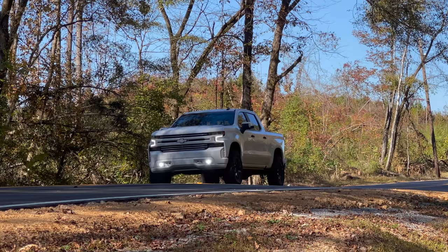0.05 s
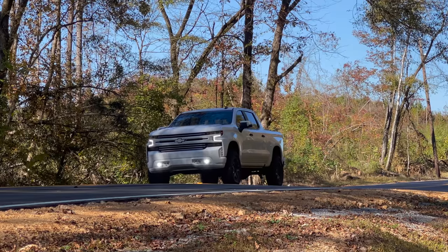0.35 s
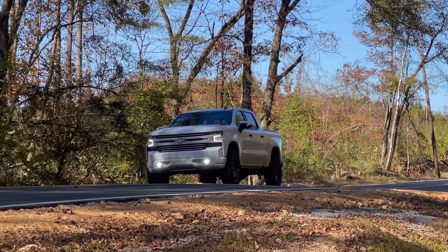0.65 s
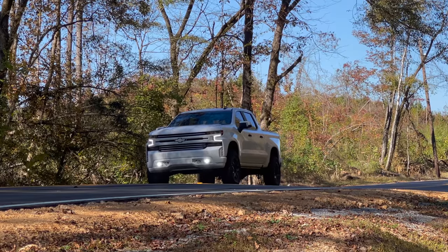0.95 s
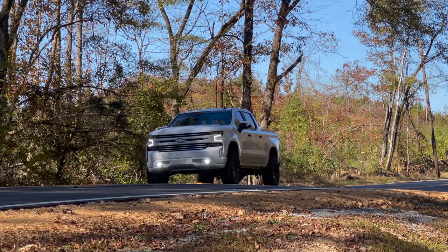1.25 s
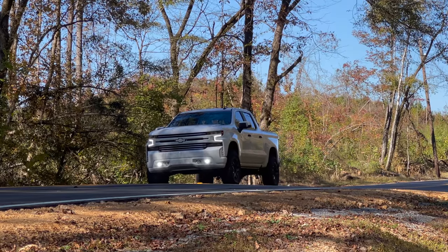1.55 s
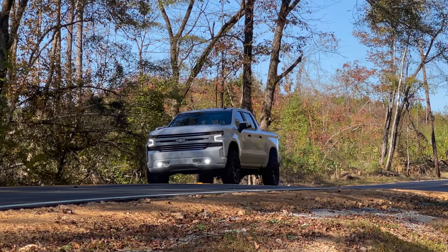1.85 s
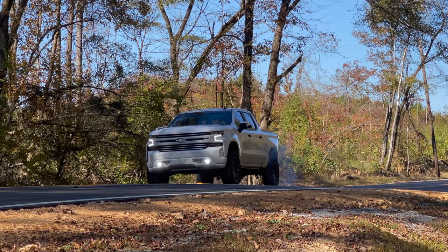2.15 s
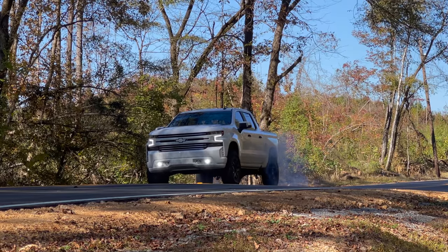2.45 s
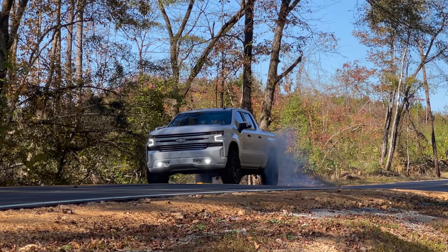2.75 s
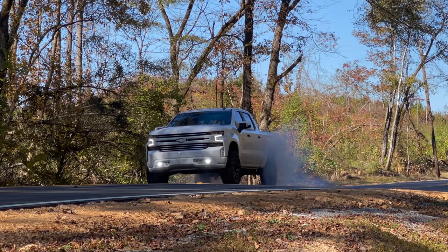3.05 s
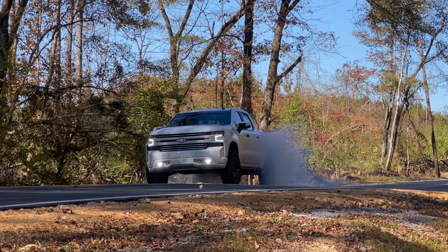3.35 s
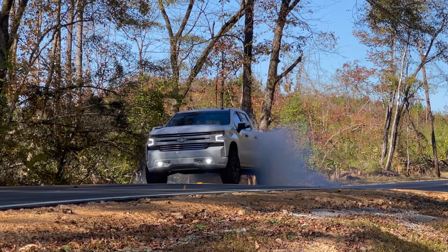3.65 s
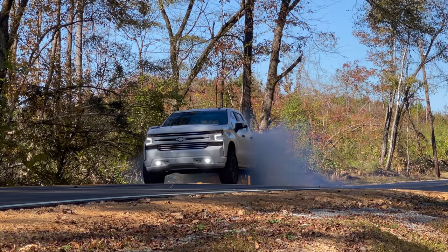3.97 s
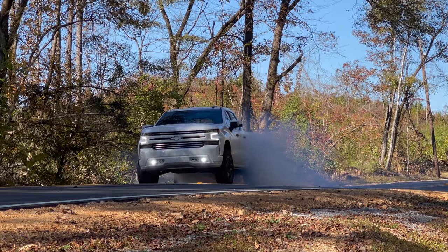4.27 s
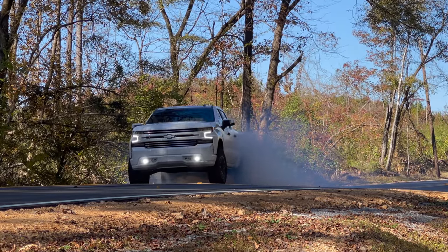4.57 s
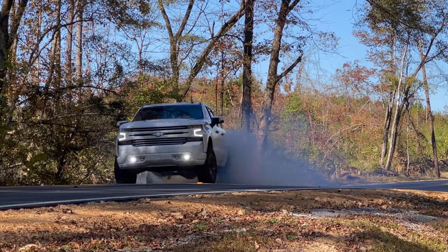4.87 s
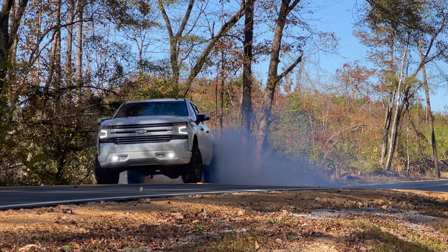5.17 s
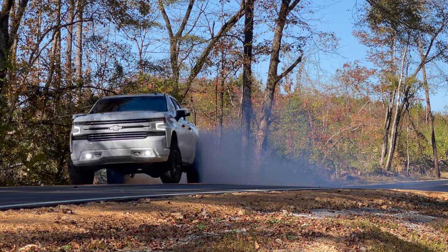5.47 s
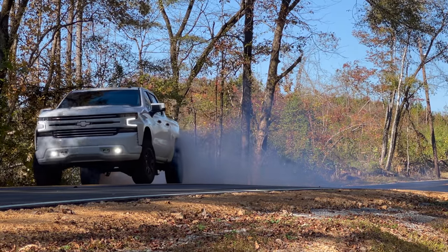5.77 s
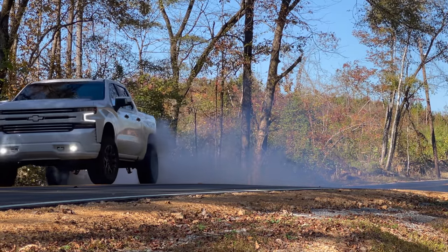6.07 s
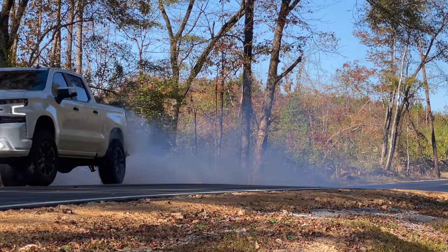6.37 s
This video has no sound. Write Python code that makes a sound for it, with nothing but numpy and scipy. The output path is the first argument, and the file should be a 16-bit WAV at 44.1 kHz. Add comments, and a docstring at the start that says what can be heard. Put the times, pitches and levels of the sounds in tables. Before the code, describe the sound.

Truck burnout outdoors: a booming V8 climbs to a high-revving roar while spinning tyres screech, then scrub and hiss, growing louder.

```python
"""A V8 pickup does a burnout on a country road among trees, with dull echoes from the trunks.
The engine opens with a low-rev boom and climbs: the exhaust drones on the orders of the engine cycle,
through pipes that warm up, and puffs rough gas at every firing. Almost at once the rear tyres break
loose and squeal in stick-slip; by two seconds they have melted into a smoky hiss.
From about four seconds the truck rolls closer, and exhaust and hiss swell to the end."""
import sys
import numpy as np
from scipy import signal
from scipy.fft import rfft, irfft, next_fast_len
from scipy.io import wavfile

SR = 44100
rng = np.random.default_rng(int(sys.argv[2]) if len(sys.argv) > 2 else 0)


def log_audio(samples):
    """Write samples as a 16-bit WAV file to the path given in sys.argv[1]."""
    # one column per channel
    frames = np.atleast_2d(samples).T
    # limit to full scale, then quantise
    limited = np.clip(frames, -1, 1)
    pcm = np.round(limited * 32767).astype(np.int16)
    wavfile.write(sys.argv[1], SR, pcm)


N = 287267
TIME = np.arange(N) / SR
LOW_END_APPROACH = 1.34   # dB the low end gains for each dB of approach


def from_db(db):
    """Decibels to gain."""
    return np.exp(np.asarray(db) * (np.log(10) / 20))


def rms_one(x):
    """Scale to unit power."""
    return x / np.sqrt(np.mean(x ** 2) + 1e-20)


def in_time(rows):
    """Each column of an automation curve, sample by sample."""
    times, *columns = np.transpose(rows)
    return [np.interp(TIME, times, column) for column in columns]


def at_hz(points, hz):
    """Read a spectrum on a log-frequency axis."""
    freqs, values = np.transpose(points)
    return np.interp(np.log(hz), np.log(freqs), values)


def bump(middle, length):
    """A flat-topped swell of height 1."""
    away = np.minimum((2 * (TIME - middle) / length) ** 2, 9)
    return np.exp(-away * away)


def drift(rate_hz):
    """Smooth random wandering of spread 1."""
    hop, settle = 40, 2000
    pole = np.exp(-2 * np.pi * rate_hz * hop / SR)
    white = rng.standard_normal(N // hop + settle + 2)
    slow = signal.lfilter([1], [1, -2 * pole, pole * pole], white)[settle:]
    return np.interp(np.arange(N) / hop, np.arange(len(slow)), rms_one(slow))


def turbulence(spectrum, patchy_db):
    """Half-octave bands of stereo noise, each flickering on its own by patchy_db; rms 1."""
    # stereo image of the noise: f/Hz, left-right correlation
    likeness = [(30, .98), (200, .995), (600, 0.72), (1300, 0.93), (2300, 1), (3600, 0.8), (6000, 1),
                (8500, 1), (12000, 0.76)]
    out, edges = 0, 20 * 2 ** np.arange(0, 9.6, .5)
    white = rng.standard_normal((2, 2, N))
    for k, (low, high) in enumerate(zip(edges, edges[1:])):
        if high < spectrum[0][0] or low > spectrum[-1][0]:
            continue
        band = signal.butter(2, [low, high], "band", fs=SR, output="sos")
        mid, side = signal.sosfilt(band, white[k % 2])
        hz = np.sqrt(low * high)
        alike = at_hz(likeness, hz)
        gain = from_db(at_hz(spectrum, hz) + patchy_db * drift(35))
        out = out + gain * (np.sqrt(1 + alike) * mid + np.sqrt(1 - alike) * side * [[1], [-1]])
    return rms_one(out)


def approach_db(distance_m, roll_s, accel_m_per_s2):
    """Gain as the truck, standing at first, creeps closer ever faster."""
    travelled_m = .5 * accel_m_per_s2 * np.maximum(TIME - roll_s, 0) ** 2
    return 20 * np.log10(distance_m / np.maximum(distance_m - travelled_m, 1))


def tree_echoes(x, t60_s, dull_hz):
    """Trunks scatter many faint dull echoes, different ones to each side."""
    echoes = np.zeros((2, N))
    for k, delay_s in enumerate(rng.uniform(.03, .35, 48)):
        lag = int(delay_s * SR)
        echoes[k % 2, lag:] += rng.choice([-1, 1]) * from_db(-60 * delay_s / t60_s) * x[:N - lag]
    return signal.sosfilt(signal.butter(1, [250, dull_hz], "band", fs=SR, output="sos"), echoes) / 2


def tyre_smoke(effort_db, near_db, grit_db):
    """Hot tread scrubs over the asphalt and sprays fine grit, hissing more as it melts."""
    # colours of the scrub and of the hiss: f/Hz, relative level/dB
    scrub_colour = [(500, -14), (1000, 6), (1700, 3), (2500, 5.5), (3400, -4.5), (4600, -9.5),
                    (7000, -33.5), (12000, -43)]
    hiss_colour = [(1800, -31), (3500, 1.5), (4700, 2), (6500, -2.5), (8700, -4.5), (12000, -7.5),
                   (14000, -16.5)]
    # fader ride on the hiss of melting rubber: t/s, level/dB
    hiss_ride = [(0.05, -53), (0.2, -56), (0.8, -53), (1.4, -50), (2.35, -52), (2.6, -48.5), (3.2, -43.5),
                 (3.45, -50), (4.1, -51), (4.6, -46.5), (5.7, -40.5), (6.5, -38)]
    hiss_db, = in_time(hiss_ride)
    break_loose_s, rise_s = .17, .13
    spinning = np.clip((TIME - break_loose_s) / rise_s, 0, 1)
    scrub_db = -37 + 0.68 * effort_db + near_db
    scrub = spinning * from_db(scrub_db) * turbulence(scrub_colour, patchy_db=1.0)
    hiss = from_db(hiss_db + 0.5) * turbulence(hiss_colour, patchy_db=0.0)
    return (scrub + hiss) * from_db(grit_db * drift(220))


def rubber_mode(curve, waver, flutter_db):
    """One self-excited vibration of a slipping tyre: its phase and its tone."""
    hz, level_db = in_time(curve)
    first, last = curve[0][0], curve[-1][0]
    gate = np.interp(TIME, [first - .02, first + .02, last - .05, last + .05], [0, 1, 1, 0])
    phase = 2 * np.pi * np.cumsum(hz * (1 + waver * drift(75.5))) / SR
    return phase, np.sqrt(2) * gate * from_db(level_db + flutter_db * drift(46)) * np.sin(phase)


def tyre_squeal(ragged_rad):
    """Both tyres sing and beat together; the slipping rubber mixes their modes into ragged overtones."""
    # squeal of each rear tyre, and a lower tread mode: t/s, f/Hz, level/dB
    curve_a = [(0.22, 700.0, -43), (0.3, 701.0, -18), (0.42, 697.0, -23.5), (0.499, 694.0, -15.5),
               (0.801, 677.0, -16.5), (0.98, 658.0, -17), (1.12, 674.0, -17), (1.5, 681.0, -20.5),
               (1.701, 692.0, -26.5), (1.85, 710.0, -29.5), (1.95, 700.0, -35)]
    curve_b = [(0.28, 658.3, -35), (0.4, 656.7, -16.5), (0.68, 620.7, -19), (0.95, 611.6, -16.5),
               (1.32, 619.0, -22), (1.55, 639.0, -18), (1.76, 659.6, -17.5), (1.86, 693, -26.5),
               (1.95, 680, -38)]
    curve_tread = [(0.38, 637.6, -33), (0.62, 582, -34), (0.9, 549, -32), (1.65, 532.7, -35),
                   (1.85, 555.0, -45)]
    # overtones and sum tones: multiple of tyre A, of tyre B, of the tread mode, relative level/dB
    partials = [(2, 0, 0, -9), (0, 2, 0, 0), (0, 1, 1, -3), (0, 0, 2, -10), (0, 0, 3, -7), (0, 1, 2, -11),
                (0, 2, 1, -11), (0, 3, 0, -11), (0, 1, 3, -17), (0, 2, 2, -19), (0, 3, 2, -23)]
    # how hard the rubber sticks and slips, riding the overtones: t/s, level/dB
    slip = [(0.22, -62), (0.35, -39), (0.5, -33.5), (0.75, -30), (1.0, -31), (1.3, -29.5), (1.55, -34),
            (1.8, -41), (2.0, -65)]
    # tyre B's main squeal tone fades out briefly: t/s, gain/dB
    dips = [(0.805, -11), (1.04, -12), (1.26, -10), (1.38, -7), (1.56, -7.5)]
    phase_a, tyre_a = rubber_mode(curve_a, waver=0.0062, flutter_db=1.34)
    phase_b, tyre_b = rubber_mode(curve_b, waver=0.00816, flutter_db=1.5)
    phase_tread, tread = rubber_mode(curve_tread, waver=.013, flutter_db=2.5)
    phases = np.array([phase_a, phase_b, phase_tread])
    overtones = 0
    for *multiples, db in partials:
        jitter = ragged_rad * (sum(multiples) - 1) * drift(48)   # higher overtones are more ragged
        overtones += from_db(db) * np.sin(np.array(multiples) @ phases + jitter)
    slip_db, = in_time(slip)
    slip_gain = np.sqrt(2) * from_db(slip_db) * (TIME < slip[-1][0])
    dip_db = sum(db * bump(middle_s, length=0.082) for middle_s, db in dips)
    return tyre_a + from_db(dip_db) * tyre_b + tread + slip_gain * overtones


def lugging_db(cycle_hz):
    """Boom of the engine pulling at low revs; it dies as they rise."""
    boom_db, full_hz, gone_hz = 20.5, 17, 29.8
    return boom_db * np.clip((gone_hz - cycle_hz) / (gone_hz - full_hz), 0, 1)


def exhaust_gas(cycle_hz, angle, effort_db, near_db, puff_depth):
    """Turbulent gas leaves the tailpipes in puffs, one a firing, loping with the uneven banks."""
    # colours of the low rumble and of the midrange rasp: f/Hz, relative level/dB
    rumble_colour = [(25, -39), (45, -13), (75, -1.5), (135, -9.5), (220, -9.5), (300, 6), (420, -0.5),
                     (520, -9), (750, -11.5), (1200, -54)]
    rasp_colour = [(250, -33), (450, -3.5), (600, -0.5), (760, 1), (950, 2.5), (1300, -1.5), (1800, -9.5),
                   (2600, -18), (4000, -40), (9000, -52)]
    beat = .6 * np.cos(8 * angle) + .5 * np.cos(3 * angle) + .4 * np.cos(angle)
    puffs = rms_one(np.exp(puff_depth * beat))
    rumble_db = -33.5 + 0.36 * effort_db + 0.38 * lugging_db(cycle_hz) + LOW_END_APPROACH * near_db
    rasp_db = -31 + 0.9 * effort_db + near_db
    rumble = from_db(rumble_db) * turbulence(rumble_colour, patchy_db=2.5)
    rasp = from_db(rasp_db) * turbulence(rasp_colour, patchy_db=1.23)
    return puffs * (rumble + rasp)


def pipe_lag(order):
    """Phase lag in the pipes: a smeared thump, then a late, inverted ring whose top orders scatter."""
    thump_top, ring_top = 5, 10   # orders
    smear_turns, late_turns, scatter_turns = 0.057, 0.2608, .43
    if order <= thump_top:
        return 2 * np.pi * smear_turns * (thump_top - 1 - order) ** 2
    turns = late_turns * (order - thump_top) + scatter_turns * max(order - ring_top, 0) ** 2
    return np.pi + 2 * np.pi * turns


def exhaust_drone(cycle_hz, angle, effort_db, near_db):
    """Each order of the engine cycle swells and fades as it slides through the pipe resonances."""
    # uneven firing of the two banks: order (multiple of the cycle rate), relative level/dB
    orders = [(2, 0.1), (3, 1.2), (4, -2), (5, 0.8), (6, -0.5), (7, -6), (8, 0.65), (9, 4), (10, -3.5),
              (11, 3.5), (12, -7.5), (13, 1.5), (14, -2), (15, -0.7), (16, 1.1), (17, -0.5), (18, 1),
              (19, 1), (20, -1.5), (21, 3), (22, 4.5), (23, -6), (24, 1), (25, -2.5), (26, 2.5)]
    # response of pipes and muffler: f/Hz, gain/dB
    pipe = [(35.0, -41.5), (55.0, -14.5), (78.0, 0), (125.0, 2.3), (150.0, 6.5), (180.0, 2), (220.0, -6.5),
            (298.0, 2), (330.0, -0.5), (356.0, 3), (385.0, 0.3), (450.0, -7), (510.0, -26), (610.0, -13),
            (730.0, -34.5), (870.0, -18.5), (1050.0, -21)]
    # single orders swell or fade for a while: middle t/s, length/s, order, gain/dB
    swells = [(0.35, 0.6, 7, 5.5), (0.4, 0.61, 11, -11), (0.5, 0.81, 9, -9), (0.522, 0.46, 13, 5.5),
              (0.598, 1, 4, -13.5), (0.92, 0.96, 5, 4.5), (1.244, 0.21, 9, 6.5), (1.864, 0.31, 5, -8),
              (1.9, 0.64, 22, -8), (2.125, 0.13, 5, 2.5), (2.46, 0.8, 10, -16), (3.1, 0.78, 5, -6.5),
              (3.11, 0.43, 9, 2.5), (3.163, 0.34, 8, 7.5), (3.4, 0.74, 11, -2.5), (3.946, 0.9, 10, 4.5),
              (4.4, 2.5, 5, 7), (4.625, 0.44, 11, 4), (5.006, 0.66, 10, -19), (5.342, 0.25, 9, 1),
              (5.603, 1.1, 8, -5.5), (5.997, 0.6, 22, 5), (6.35, 0.63, 11, 4.5)]
    # fader ride on the bass, orders two to four: t/s, gain/dB
    bass_ride = [(0.3, 5), (1.0, -0.5), (2.3, -2.5), (3.0, 0.5), (4.2, -0.5), (5.4, 2.5), (5.95, 0),
                 (6.4, -3.5)]
    body_db = -32 + 0.41 * effort_db + LOW_END_APPROACH * near_db
    bass_db = body_db + in_time(bass_ride)[0]
    growl_db = -24.5 + .55 * effort_db + 10.5 * np.log2(cycle_hz / 37.7) + near_db   # grows with revs
    # the firing beat booms at low revs and drives its own octave
    firing_db = body_db + lugging_db(cycle_hz)
    booming_db = {8: firing_db, 16: np.maximum(growl_db, firing_db - 10.5)}
    # the resonances rise as the gas heats up
    warming_per_s, in_tune_s = 0.015, 3.0
    tuning = 1 + warming_per_s * (TIME - in_tune_s)
    drone = 0
    for order, order_db in orders:
        register_db = bass_db if order < 5 else body_db if order < 14 else growl_db
        level_db = booming_db.get(order, register_db) + order_db
        swell_db = sum(db * bump(t, length) for t, length, which, db in swells if which == order)
        if 5 < order < 14:   # the middle orders also fade in and out slowly, each on its own
            swell_db += 1.23 * drift(3.15)
        pipe_db = at_hz(pipe, order * cycle_hz / tuning)
        # combustion varies from cycle to cycle, which blurs the high orders most
        blur = 0.12 + 0.39 * (order / len(orders)) ** 3
        phase = order * angle - pipe_lag(order) + blur * drift(19)
        drone += from_db(level_db + swell_db + pipe_db) * (1 + blur * drift(8.6)) * np.sin(phase)
    flutter = from_db(-0.16 * drift(45))
    return np.sqrt(2) * drone * flutter


def scene():
    """Exhaust, squeal and their echoes sit slightly left of centre, over the scrub and hiss."""
    # engine speed in four-stroke cycles, eight firings each: t/s, f/Hz
    speed = [(0.03, 12.4), (0.2, 18.3), (0.3, 20.5), (0.6, 23.2), (1, 28.1), (1.45, 36.8), (1.82, 41.7),
             (2, 38.9), (2.11, 33.6), (2.2, 35.7), (2.3, 35.3), (2.9, 39.2), (3.17, 40.0), (3.8, 35.8),
             (4.25, 34.9), (4.6, 36.4), (5.1, 37.7), (5.35, 39.8), (5.8, 41.2), (6.51, 42.3)]
    # power put into the spinning wheels: t/s, level/dB
    effort = [(0.05, -15.5), (0.22, -10.5), (0.31, -5.5), (0.5, -4), (0.75, 2), (1.4, -3), (2.35, -2),
              (2.8, 3), (3.2, 2.5), (3.6, -2), (4.1, -4), (5, -0.9), (5.7, 2.5), (6.5, 2.5)]
    cycle_hz, = in_time(speed)
    effort_db, = in_time(effort)
    near_db = approach_db(distance_m=22.4, roll_s=3.736, accel_m_per_s2=2.93)
    angle = 2 * np.pi * np.cumsum(cycle_hz) / SR
    tones = exhaust_drone(cycle_hz, angle, effort_db, near_db) + tyre_squeal(ragged_rad=0.61)
    gas = exhaust_gas(cycle_hz, angle, effort_db, near_db, puff_depth=0.27)
    echoes = from_db(-16.5) * tree_echoes(tones, t60_s=2.0, dull_hz=2500)
    pan = from_db([[.7], [-.7]])
    return (tones + gas + echoes) * pan + tyre_smoke(effort_db, near_db, grit_db=0.4)


def record(dry):
    """The sound opens abruptly; two microphone ports part in phase near the top, which is then cut."""
    # phase lag of the left port in the high treble: f/Hz, lag/turns
    port_lag = [(8700, 0), (10200, .5), (11700, 1)]
    start_s, fade_s, cutoff_hz = .036, .004, 11900
    left, right = dry * np.clip((TIME - start_s) / fade_s, 0, 1)
    size = next_fast_len(2 * N)
    turns = np.interp(np.fft.rfftfreq(size, 1 / SR), *np.transpose(port_lag))
    left = irfft(rfft(left, size) * np.exp(-2j * np.pi * turns), size)[:N]
    high_cut = signal.ellip(10, .3, 80, cutoff_hz, fs=SR, output="sos")
    return signal.sosfilt(high_cut, [left, right])


dry = scene()
out = record(dry)
log_audio(out)
```